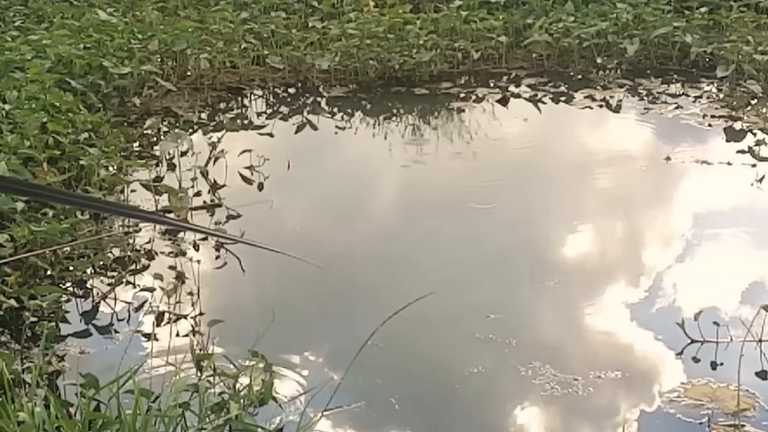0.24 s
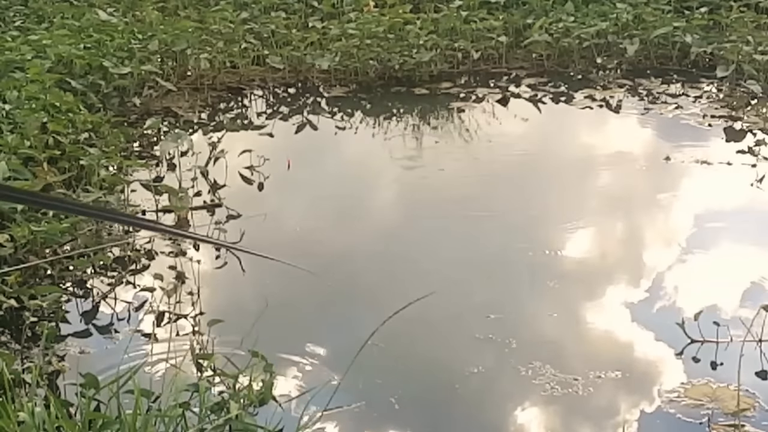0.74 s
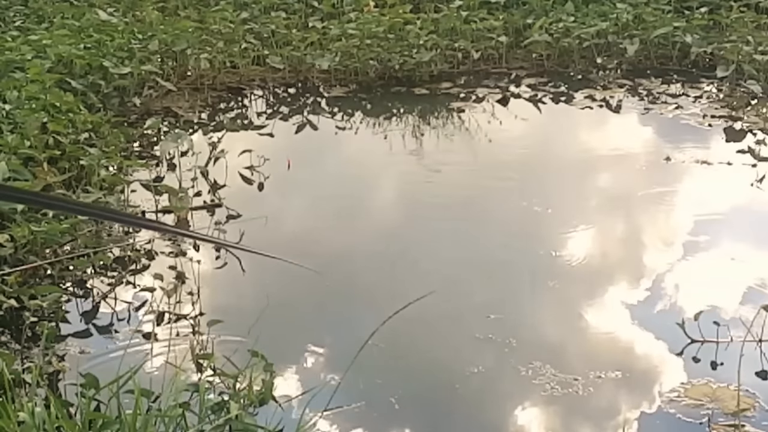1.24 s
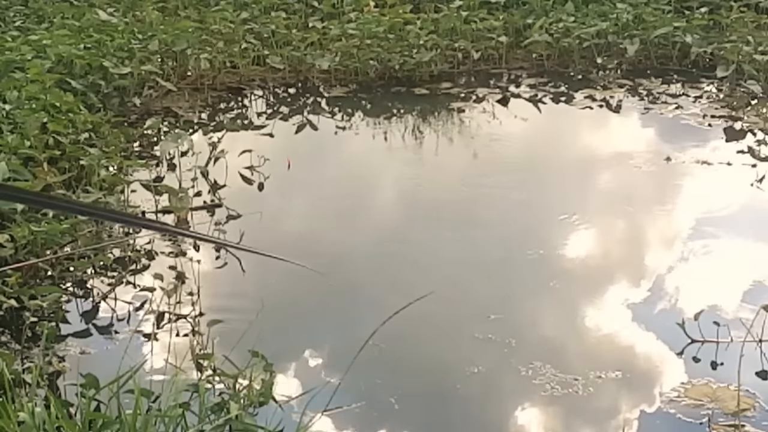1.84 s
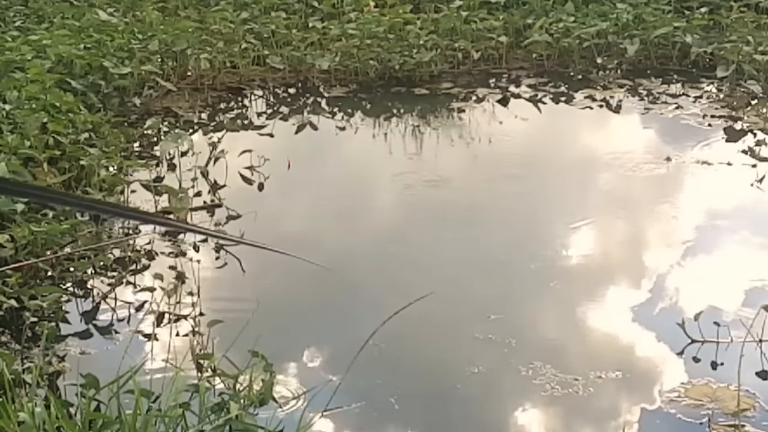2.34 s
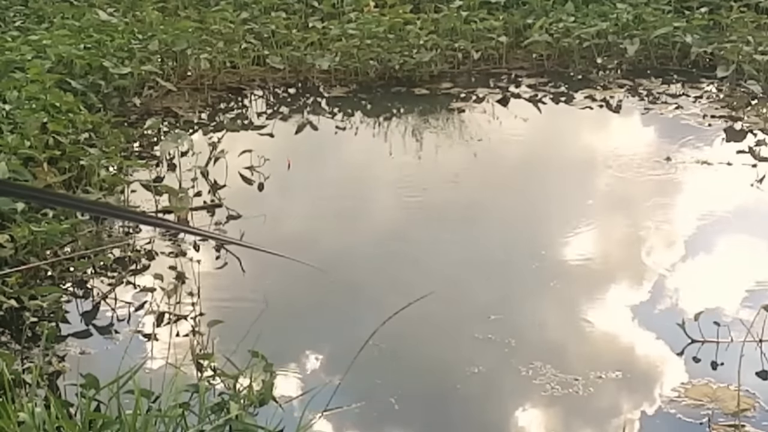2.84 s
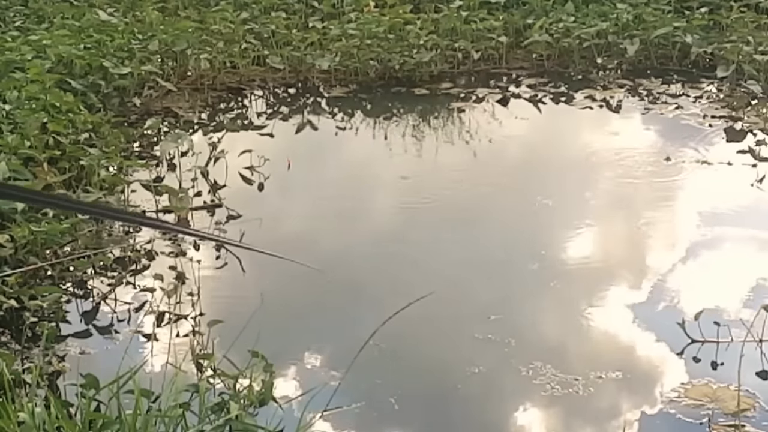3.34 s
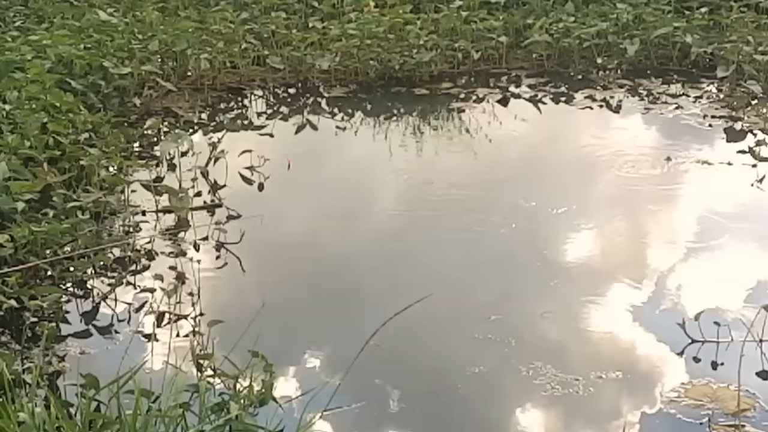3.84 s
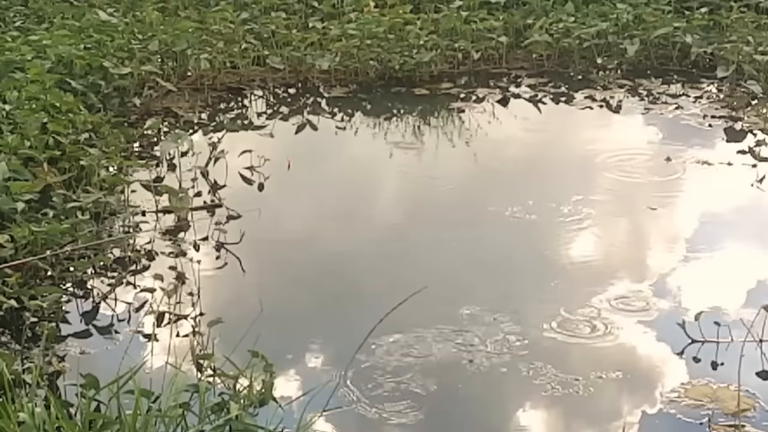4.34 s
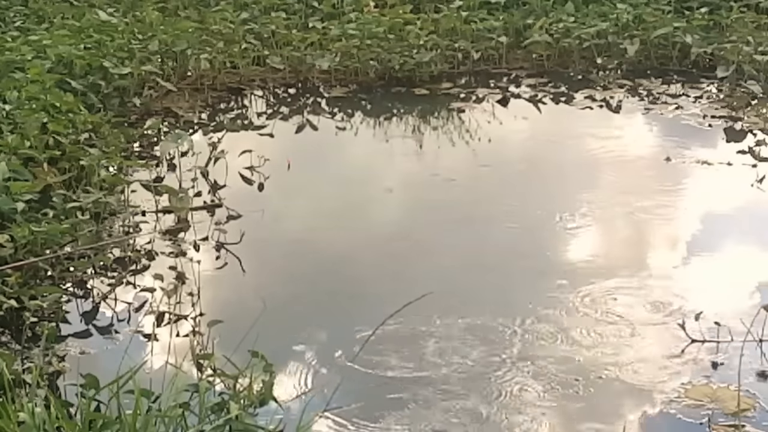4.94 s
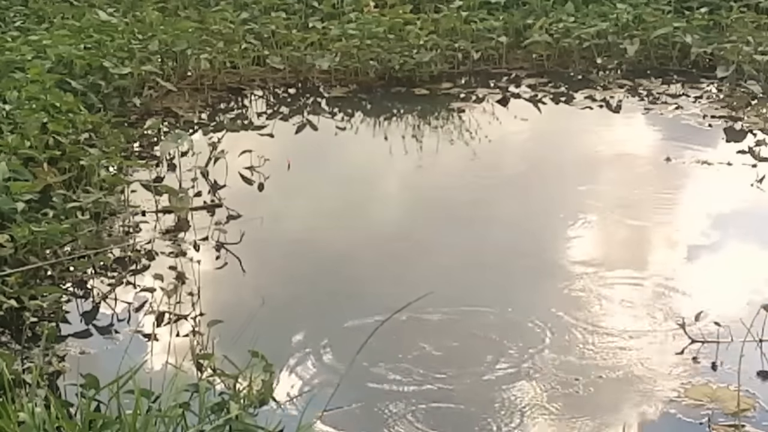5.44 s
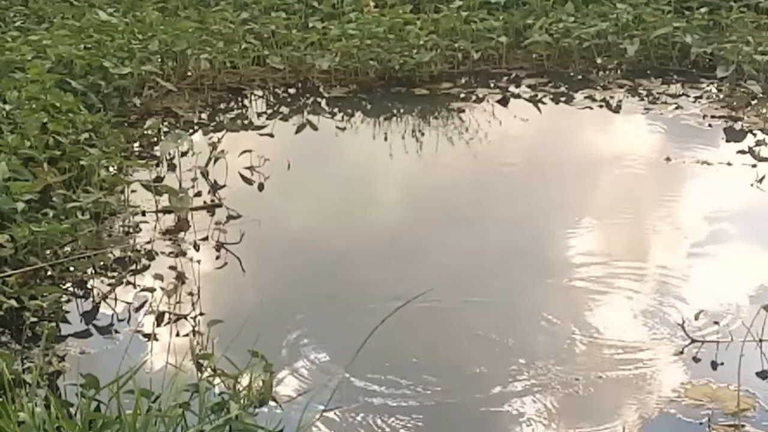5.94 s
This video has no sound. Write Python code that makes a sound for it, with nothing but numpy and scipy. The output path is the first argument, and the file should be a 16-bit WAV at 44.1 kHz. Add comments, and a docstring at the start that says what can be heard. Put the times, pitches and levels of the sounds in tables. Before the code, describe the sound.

Beside a pond, a fishing rod gives a couple of soft thuds and scattered ticks close by, slightly to the left. A faint bird peeps several times, then the rod snaps upward in a quick cluster of clicks, followed by a light sprinkle and a few drips on the water. Throughout, high insect chirring carries on over the low throb of a distant idling engine and a soft hiss of leaves.

```python
"""Fishing at a weedy pond

A chorus of insects chirrs while a small engine idles unevenly far away. Close by a fishing rod is
handled and flicked up: ticks, short rustles, soft thuds, then fine drops on the water. A bird peeps
and leaves hiss. Two microphones a hand apart hear the engine and the air first on the left."""
import sys
import numpy as np
from scipy import signal
from scipy.fft import rfft, irfft, next_fast_len
from scipy.io import wavfile
from scipy.ndimage import uniform_filter1d, map_coordinates

SR = 44100
rng = np.random.default_rng(int(sys.argv[2]) if len(sys.argv) > 2 else 0)


def pcm_store(signal):
    """Save signal as 16-bit PCM."""
    levels = np.round(np.clip(np.atleast_2d(signal), -1, 1) * 32767)
    wavfile.write(sys.argv[1], SR, levels.astype(np.int16).T)


N = 272979
FAR_LEAD_S = 0.00035  # far sounds reach the left microphone this much sooner


def insects():
    """The clicks of many insects blur into pulsing noise that makes their bodies ring."""
    # Groups of insects. Each row: body pitch in Hz, band width in Hz, starting level in dB,
    # left minus right in dB, clicks per second, swells per second.
    singers = [(7360, 420, -67.5, -4.5, 110, 8.5), (7764, 375, -56.5, -2, 140, 11),
               (8093, 290, -54, 0, 100, 10), (8463, 370, -65, 9.5, 110, 8.6),
               (9170, 510, -85, 15.5, 16, 12)]
    growth_db_per_s = 0.0649
    out, t = 0, np.arange(N) / SR
    for hz, width, db, pan_db, clicks, swells in singers:
        beat = 2 * np.pi * np.cumsum(clicks * (1 + 0.0507 * wobble(5))) / SR
        swell = 1 + 0.14 * np.sin(2 * np.pi * swells * t + 1.73 * wobble(2.7))
        pulsing = (1 + 0.17 * np.sin(beat)) * swell
        # scattered singers sound different on each side
        shared, apart = rng.standard_normal(N), rng.standard_normal((2, N))
        song = unit(resonate(pulsing * (0.21 * shared + apart), hz, width))
        out = out + amp(db + pan_db / 2 * np.array([[1], [-1]])) * song
    return out * amp(growth_db_per_s * t)


def engine():
    """The exhaust sounds at 1, 2 and 4 times the firing rate; uneven firings make it throb."""
    # The idle goes quiet before its speed sags. Each row: time in seconds, firings per second,
    # boost of the second tone in dB.
    idle = [(0, 46, -2.5), (.1, 47.23, -6), (.36, 47.7, 3.5), (.7, 47.7, -8), (.79, 45.54, -0.5),
            (1.17, 46.5, -4), (1.27, 46.5, -1.5), (1.5, 46.33, -0.5), (1.78, 49.8, -2), (2.3, 49.1, -4),
            (2.48, 49.35, -29), (2.68, 48.46, 3.5), (2.79, 49.1, -3.5), (2.9, 46.2, 2), (3.1, 46.7, -1.5),
            (3.36, 48.1, -2.5), (3.49, 48.66, -12), (3.6, 45.97, -1.5), (4.58, 48.9, -1), (4.78, 49.3, -15),
            (4.88, 49.05, 1), (5.1, 47.8, -1.5), (6.19, 48.55, -1.5)]
    # a heavy flywheel changes speed gradually
    rate, boost_db = uniform_filter1d(curves(idle), size=SR // 18, axis=1)
    pipe = np.abs(resonance(2 * rate, centre_hz=91.4, width_hz=8.3))  # rings most at low speed
    phase = 2 * np.pi * np.cumsum(rate + 0.38 * wobble(6.4)) / SR
    throb = 1 + 0.38 * np.sin(phase / 6.3 + 1.8 * wobble(2.7))
    first = amp(-51.5 + 0.49 * wobble(3.2)) * throb * np.sin(phase)
    second = pipe * amp(-46.5 + boost_db + 1.6 * wobble(16)) * np.sin(2 * phase + 0.19 * wobble(22))
    fourth = amp(-74.0 + 0.91 * wobble(2.3)) * np.sin(4 * phase + 0.85 * wobble(9.9))
    return left_first(np.sqrt(2) * (first + second + fourth), FAR_LEAD_S)


def knock(out, start, db, hz, width, lead_ms):
    """Add one blow that makes an object ring and die away."""
    t, onset = np.arange(SR // 3) / SR, 32
    # bright blows scatter into a little noise
    blow = rng.standard_normal(len(t)) * 0.055 * min(1, hz / 3000) * amp(-60 * t / 0.06)
    blow[:onset] = 0
    blow[onset] = -1
    ring = resonate(blow, hz, width)
    add(out, start - onset / SR, amp(db) * left_first(ring / np.abs(ring).max(), lead_ms / 1000))


def rod():
    """The rod's butt thuds; the rod and drips tick. Narrow bands ping and wide ones crack."""
    # Each row: start in seconds, peak level in dB.
    thuds = [(0.734, -38.5), (1.199, -40), (4.324, -45), (4.545, -47)]
    # Each row: start in seconds, peak level in dB, pitch in Hz, band width in Hz.
    ticks = [(1.42, -47, 1630, 300.3), (1.827, -54, 3110, 792), (2.165, -53, 5530, 1504),
             (2.449, -58, 2530, 498), (2.577, -52.5, 2360, 500), (2.705, -50, 2370, 589.4),
             (2.958, -54, 2892, 905), (2.968, -53, 3750, 496.6), (3.090, -54, 2473, 602.6),
             (3.476, -50.5, 3240, 550), (3.4813, -44.5, 3720, 1700), (3.4828, -54, 5140, 1300),
             (3.484, -62, 2800, 500), (3.524, -52, 3904, 1618), (3.527, -52.5, 2470, 600),
             (3.580, -56.5, 4045, 350), (3.9784, -34.5, 2158, 4593), (3.9793, -48, 1510, 900),
             (4.027, -53, 2850, 400), (4.034, -53, 2520, 280.4), (4.0475, -42, 3970, 2990),
             (4.049, -50, 2400, 900), (4.051, -40, 5200, 5000), (4.051, -47, 10500, 3000),
             (4.0488, -50.5, 1690, 898), (4.057, -39.5, 6500, 3500), (4.11, -61, 6006, 4000),
             (4.162, -59, 6134, 2502), (4.2, -69, 1951, 400), (4.271, -57, 1925, 348.4),
             (4.318, -51, 568, 250.5), (4.5185, -50.5, 2892, 900), (4.519, -56, 5030, 900),
             (4.567, -57, 3300, 1200), (4.683, -60, 3100, 600), (4.7, -59, 4935, 1500),
             (4.7455, -47, 2240, 904), (4.7455, -49, 5500, 3000), (4.772, -58, 2530, 400),
             (4.782, -58, 4200, 2000), (4.836, -53, 5540, 2500), (4.838, -63, 3000, 600)]
    # The rod is lifted from the left to the front. Each row: time in seconds, left side's lead in ms.
    rod_side = [(3.2, 0.36), (3.4, 0.031)]
    out = np.zeros((2, N))
    for start, db in thuds:
        knock(out, start, db, hz=138, width=29.4, lead_ms=0.4)
    for start, db, hz, width in ticks:
        knock(out, start, db, hz, width, lead_ms=np.interp(start, *np.transpose(rod_side)))
    return out


def snaps():
    """Tiny bursts of noise make faint, very high ticks, mostly on the left."""
    # Each row: start in seconds, peak level in dB midway between the two sides.
    bursts = [(0.2505, -64), (0.8292, -59), (1.556, -65), (1.9025, -56), (2.428, -64), (4.052, -59)]
    out, t = np.zeros((2, N)), np.arange(SR // 3) / SR
    for start, db in bursts:
        snap = resonate(rng.standard_normal(len(t)) * amp(-60 * t / 0.08), hz=13200, width=3000)
        add(out, start, amp(db) * snap / np.abs(snap).max() * amp([[2.5], [-2.5]]))
    return out


def rustles_and_hiss():
    """Grainy noise rises fast and fades: short rustles and one brief, faint wash of very high hiss."""
    # Each row: start in seconds, level at its loudest in dB, pitch in Hz, band width in Hz,
    # seconds to fade by 60 dB. The row at 10900 Hz is the hiss.
    bursts = [(.12, -77, 2340, 301, 0.55), (0.538, -59, 1750, 1500, 0.18), (.57, -61, 382, 200, 0.14),
              (.59, -69, 2090, 1600, 0.68), (.72, -54.5, 508.5, 600, 0.032), (.73, -68, 1490, 300, .06),
              (.63, -75, 2880, 500, 0.28), (.92, -69, 2004, 2009, 0.28), (1.189, -62.5, 1656, 1000, 0.098),
              (1.428, -61.5, 381, 200, 0.09), (2.16, -53.5, 345, 398.5, 0.051),
              (2.52, -63.5, 2048, 700, 0.22), (3.1, -68, 2480, 500, 0.3), (3.36, -64.5, 2490, 900, 0.19),
              (3.978, -61.5, 1479, 900, 0.14), (4.022, -56, 2550, 1112, 0.16),
              (4.046, -61, 3950, 6010, 0.1), (4.06, -70, 5800, 5000, 0.26), (4.15, -71, 5006, 4947, 0.81),
              (4.05, -72, 10900, 6040, 0.24), (4.32, -63, 543, 354, 0.26), (4.52, -60, 2200, 501.4, 0.12),
              (4.515, -57, 501, 249, .16), (4.528, -66.5, 910, 1500, 0.31), (4.56, -70, 1100, 703, 0.15),
              (4.64, -66.5, 1300, 1207, 0.23), (4.66, -63, 509, 397.7, 0.098), (4.7, -74, 1500, 1800, 0.44),
              (4.66, -63.5, 2160, 900, 0.14), (4.768, -61, 990, 600, .16), (4.771, -64.5, 2400, 500, 0.14)]
    out, t = np.zeros((2, N)), np.arange(SR // 3) / SR
    for start, db, hz, width, fade_s in bursts:
        grains = rng.standard_normal(len(t)) * amp(4.8 * rng.standard_normal(len(t)))
        rise_s = 0.038 * fade_s
        shape = (1 - np.exp(-t / rise_s)) ** 2 * amp(-60 * t / fade_s)
        burst = unit(resonate(grains, hz, width, passes=3) * shape) / unit(shape).max()
        add(out, start, amp(db) * left_first(burst, lead_s=0.00011))
    return out


def spray():
    """Fine drops patter on the water after the flick, swelling and thinning out."""
    start_s, length_s, drops_per_s = 4.07, 0.35, 500
    progress = np.clip((np.arange(N) / SR - start_s) / length_s, 0, 1)
    drops = rng.standard_normal((2, N)) * (rng.random((2, N)) < drops_per_s / SR)
    patter = unit(resonate(drops, hz=5530, width=7000))
    return amp(-71) * patter * np.sqrt(np.abs(np.sin(np.pi * progress)))


def bird():
    """Each far call is a sliding, slightly hoarse whistle that the air on the way makes flutter."""
    # Each row: start in seconds, length in seconds, first pitch in Hz, level in dB,
    # slide in Hz per second, flutter common to both sides in dB.
    calls = [(0.097, 0.042, 2890, -73, 200, 0), (.13, 0.21, 2350, -79, -300, 4),
             (0.292, .065, 2880, -75.5, 600, 1.5), (.36, .05, 2770, -81, -1500, -1),
             (.635, 0.08, 2860, -78, 200, 0), (.698, .035, 2600, -70, -1500, 0),
             (3.249, .13, 4243, -79, 9500, 3), (3.497, 0.026, 3450, -77, -1500, 2),
             (3.605, .027, 3430, -69, -6000, 1.2), (3.71, .043, 3420, -72, -4500, 4),
             (3.811, 0.043, 3522, -69, -6500, 4), (3.936, 0.032, 3390, -68, -900, 5),
             (5.148, 0.16, 3744, -82, 11000, 5)]
    out = np.zeros((2, N))
    for start, length, hz, db, slide, flutter_db in calls:
        progress = np.linspace(0, 1, round(length * SR))
        jitter = rng.standard_normal((4, len(progress)))
        hoarse, shared, *apart = uniform_filter1d(jitter, size=SR // 250, axis=1)
        pitch = hz + slide * length * progress + 25 * unit(hoarse)
        flutter = amp(flutter_db * unit(shared) + 2.2 * unit(np.array(apart)))
        soft_ends = np.abs(np.sin(np.pi * progress)) ** 0.17
        add(out, start, amp(db) * soft_ends * tone(pitch) * flutter)
    return out


def hums():
    """Four far hums waver a little in pitch and loudness."""
    # Each row: pitch in Hz, level in dB, pitch waver in Hz, level waver in dB, drift in dB per second.
    tones = [(78, -62, 5.03, 4, 0), (134.5, -65, 1.05, 3, 0), (631, -74.5, 2.97, 3, -0.82),
             (386.7, -79.5, 5.05, 3, 0)]
    out, t = 0, np.arange(N) / SR
    for hz, db, waver_hz, waver_db, drift in tones:
        out = out + amp(db + drift * t + waver_db * wobble(4.2)) * tone(hz + waver_hz * wobble(8))
    return left_first(np.sqrt(2) * out, FAR_LEAD_S)


def air():
    """Distant rumble, the hiss of leaves, and a thin, very high fizz that is stronger on the left."""
    # The tone colour of each noise. Each row: frequency in Hz, relative level in dB.
    rumble_colour = [(20, -27), (34, -28), (44, -2), (62, -2), (80, -3.5), (115, -4.5), (160, -7.5),
                     (220, -12.5), (260, -18.5), (500, -18), (800, -26.5), (1300, -58)]
    leaf_colour = [(300, -8), (700, 9.5), (1200, 8), (2400, 2), (4000, -3), (6300, -7), (9300, -7),
                   (10200, -15), (11000, -54), ]
    fizz_colour = [(10000, -65), (11000, -16), (11800, -1.5), (14500, -0.5)]
    # How loud the leaves are. Each row: time in seconds, level in dB.
    leaf_levels = [(0, -64.5), (.8, -63.5), (1.8, -65), (3.2, -64), (4.5, -63.5), (5.2, -64.5),
                   (6.19, -63.5)]
    rumble = amp(-55 + 1.15 * wobble(6)) * rush(rumble_colour, patchy_db=1.0)
    sparks = rng.random(N) * (rng.random(N) < 30 / SR)  # about 30 a second
    flare = SR // 250  # each lasts 4 ms
    ticking = 1 + 0.47 * uniform_filter1d(sparks, size=flare) * flare
    leaves = amp(curves(leaf_levels)[0] + 1.04 * wobble(8.6)) * rush(leaf_colour, patchy_db=1.6)
    fizz = amp(-69.5 + 0.8 * wobble(23)) * ticking * rush(fizz_colour, patchy_db=2.1)
    return rumble + leaves + fizz * amp([[1.3], [-1.3]])


def rush(colour, patchy_db):
    """Far stereo noise with random louder and softer patches in time and pitch."""
    # Each row: frequency in Hz, how alike the two sides are from 0 to 1.
    likeness = [(60, 0.99), (200, 0.95), (400, 0.79), (700, 0.89), (1400, 0.55), (2500, 0.085),
                (4000, 0.012), (14000, 0.064)]

    def mid_and_side(hz):
        angle = np.arccos(along(likeness, hz)) / 2
        return amp(along(colour, hz)) * [np.cos(angle), np.sin(angle)]

    grid = signal.stft(rng.standard_normal((2, N)), nperseg=512)[2]
    patches = uniform_filter1d(uniform_filter1d(rng.standard_normal(grid.shape[1:]), 6, 0), 8, 1)
    noise = signal.istft(grid * amp(patchy_db * unit(patches)), nperseg=512)[1][:, :N]
    mid, side = filtered(noise, mid_and_side)
    return left_first(unit(np.array([mid + side, mid - side])), FAR_LEAD_S)


def amp(db):
    """Turn decibels into a multiplier."""
    return 10 ** (np.asarray(db) / 20)


def unit(x):
    """Scale x to an average power of 1."""
    return x / np.sqrt(np.mean(x ** 2) + 1e-20)


def tone(hz):
    """A pure tone that follows a changing pitch."""
    return np.sin(2 * np.pi * np.cumsum(hz) / SR)


def along(points, hz):
    """Read between (Hz, value) points, with octaves evenly spaced."""
    freqs, values = np.transpose(points)
    return np.interp(np.log(hz + 1), np.log(freqs + 1), values)


def curves(rows):
    """One value per sample for each column after the time."""
    times, *columns = np.transpose(rows)
    return [np.interp(np.arange(N) / SR, times, column) for column in columns]


def wobble(rate):
    """A smooth curve through `rate` random points a second."""
    return map_coordinates(rng.standard_normal(int(N * 40 / SR)), [np.arange(N) * rate / SR])


def filtered(x, response):
    """Scale and delay each frequency of x as response(hz) says."""
    size = next_fast_len(x.shape[-1] + 4096)
    return irfft(rfft(x, size) * response(np.fft.rfftfreq(size, 1 / SR)), size)[..., :x.shape[-1]]


def resonance(hz, centre_hz, width_hz):
    """How a ringing object answers each frequency."""
    return 1j * hz * width_hz / (centre_hz ** 2 - hz * hz + 1j * hz * width_hz)


def resonate(x, hz, width, passes=2):
    """Send x through a resonance; each pass narrows the band further."""
    return filtered(x, lambda f: resonance(f, hz, width) ** passes)


def left_first(x, lead_s):
    """Stereo sound that reaches the left side lead_s seconds before the right."""
    pair = x * np.ones((2, 1))
    return filtered(pair, lambda hz: np.exp(1j * np.pi * hz * lead_s * np.array([[1], [-1]])))


def add(out, start_s, sound):
    """Mix in a short stereo sound."""
    start = round(start_s * SR)
    out[:, start:start + sound.shape[1]] += sound


def scene():
    """All sources together; engine, hums and air are a little stronger on the left."""
    far = insects() + (engine() + hums() + air()) * amp([[.15], [-.15]])
    return far + rod() + snaps() + rustles_and_hiss() + bird() + spray()


def record(dry):
    """The microphones keep nothing above a top frequency and add a tiny constant offset."""
    top_hz, offset = 14500, -.0006
    return filtered(dry, lambda hz: hz < top_hz) + offset


dry = scene()
out = record(dry)
pcm_store(out)
```